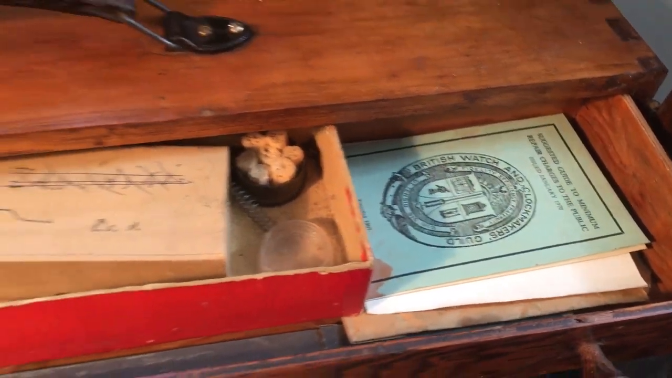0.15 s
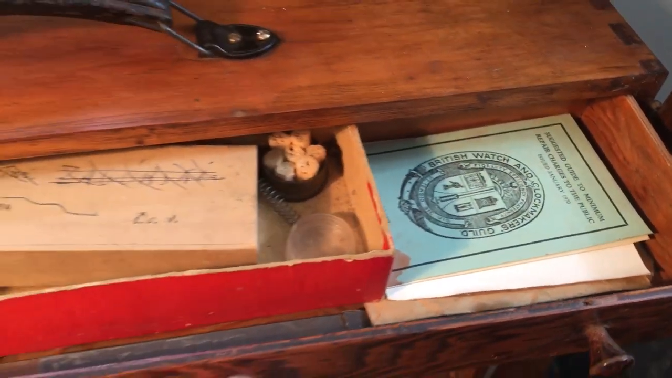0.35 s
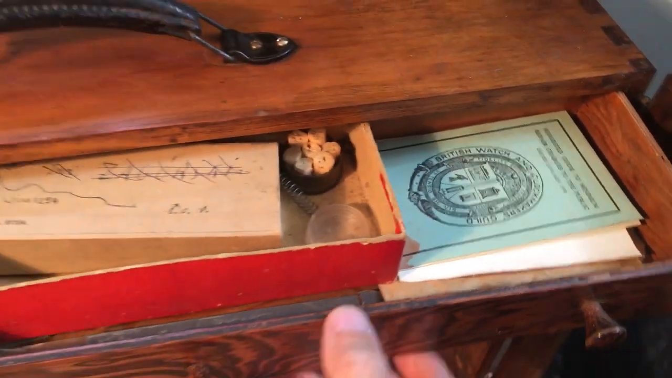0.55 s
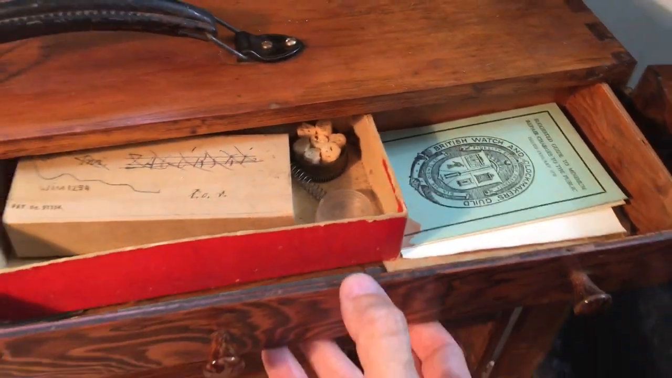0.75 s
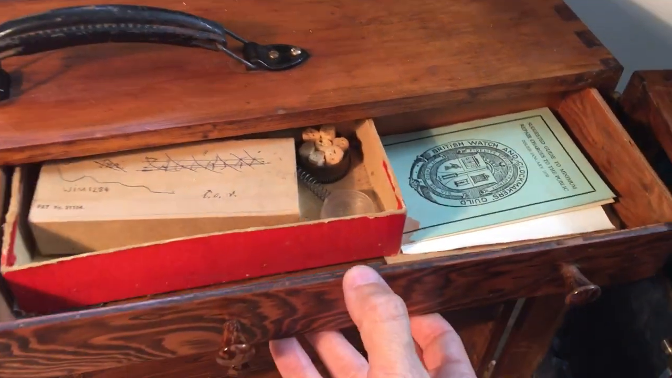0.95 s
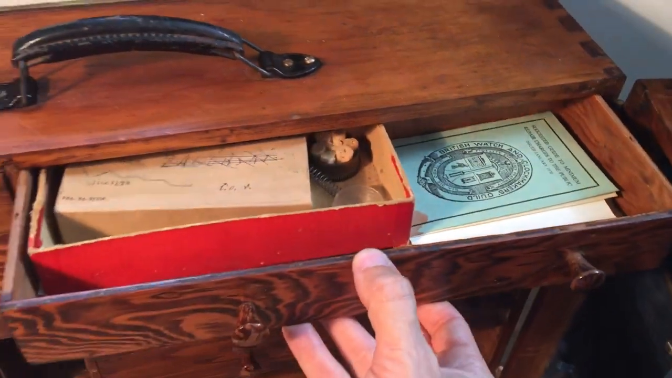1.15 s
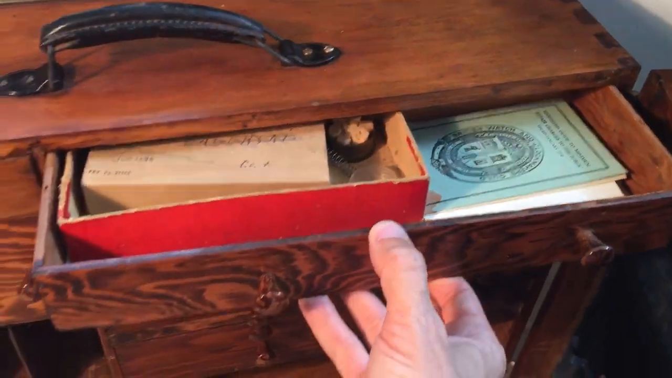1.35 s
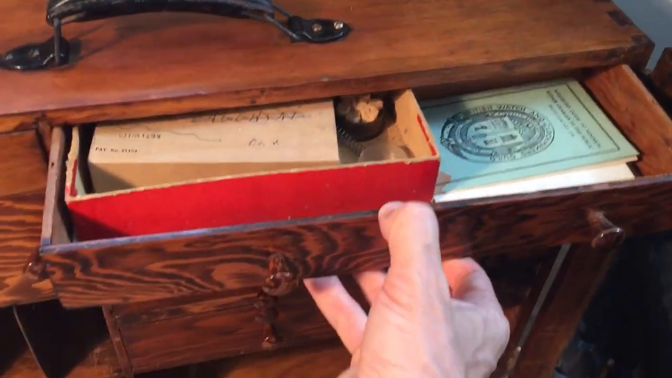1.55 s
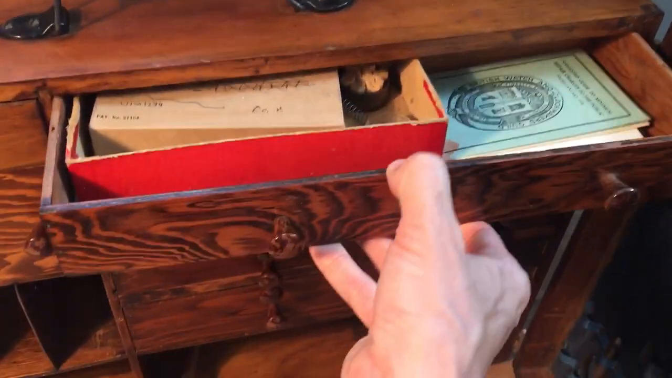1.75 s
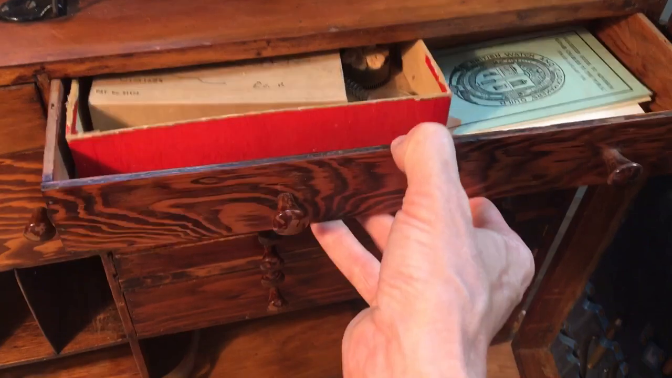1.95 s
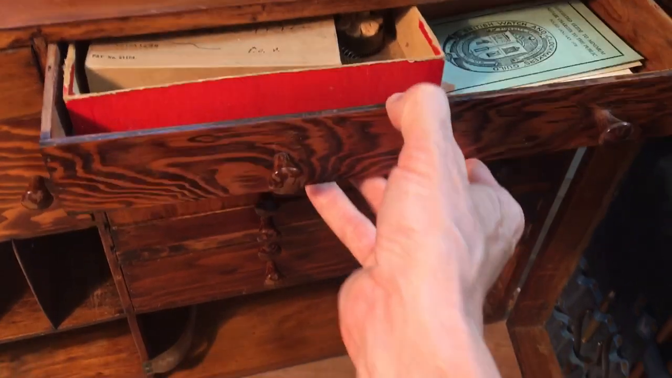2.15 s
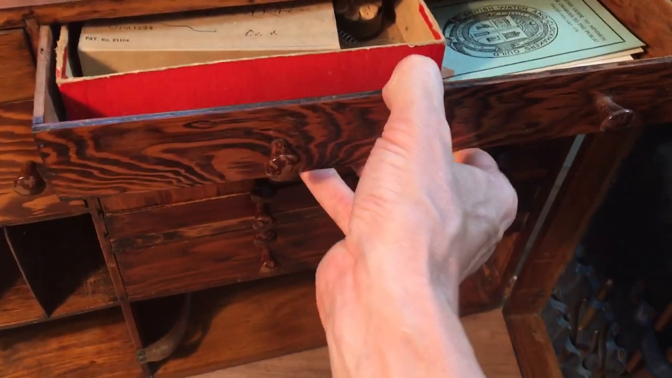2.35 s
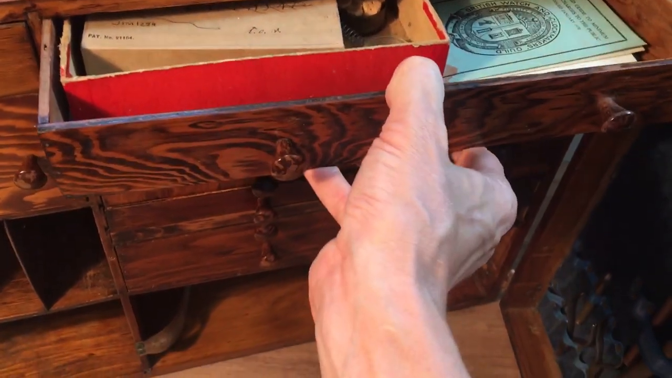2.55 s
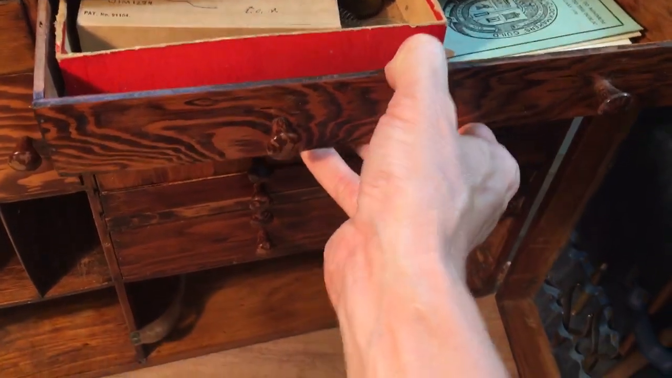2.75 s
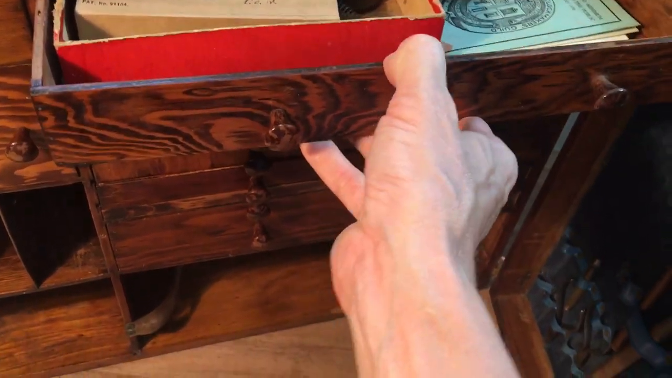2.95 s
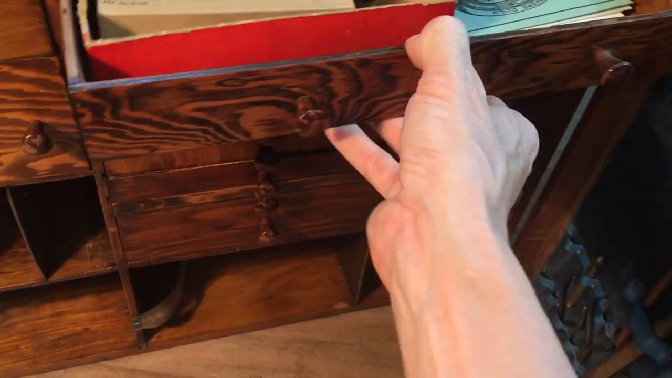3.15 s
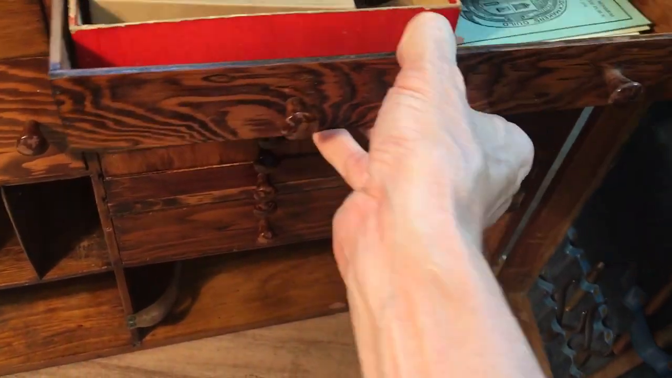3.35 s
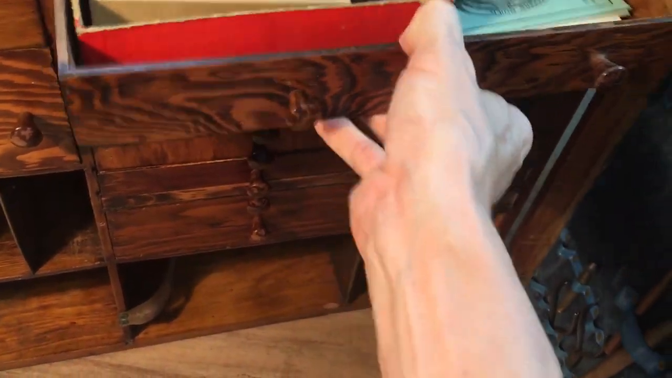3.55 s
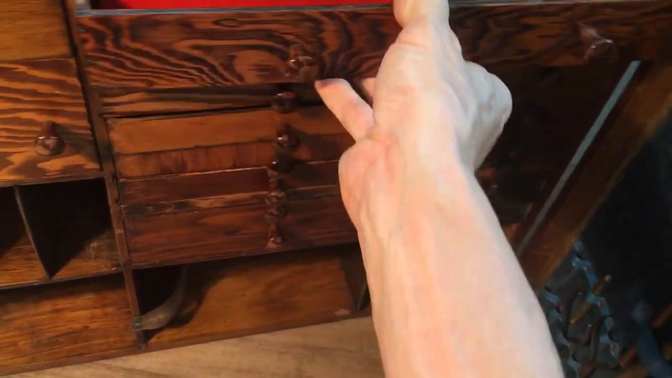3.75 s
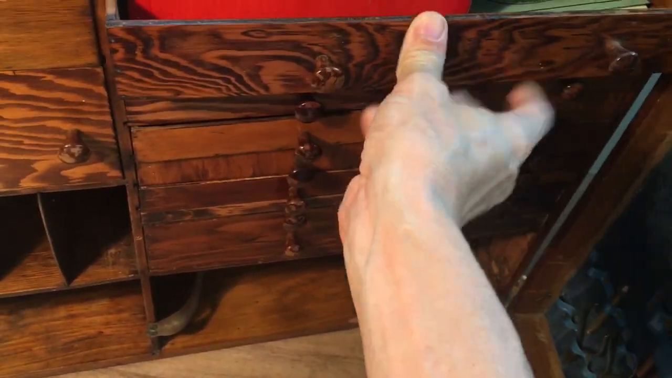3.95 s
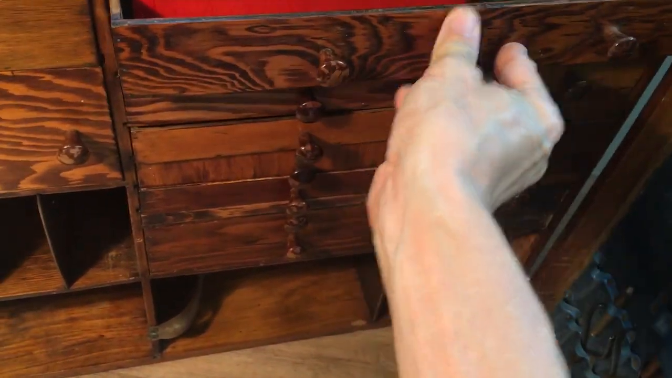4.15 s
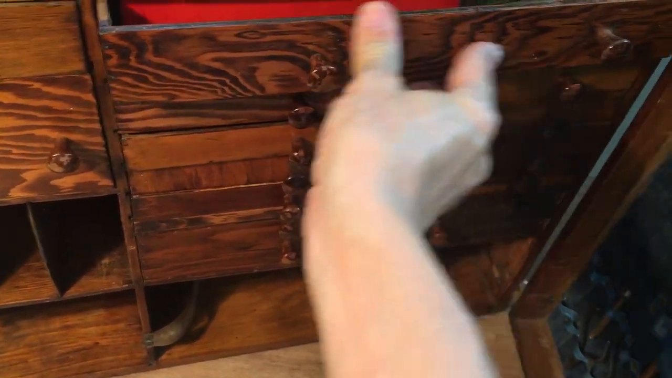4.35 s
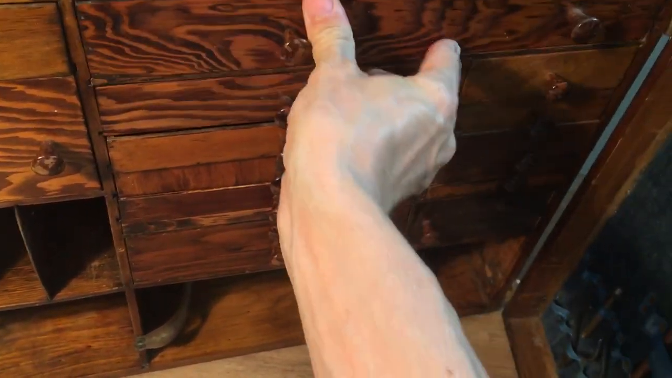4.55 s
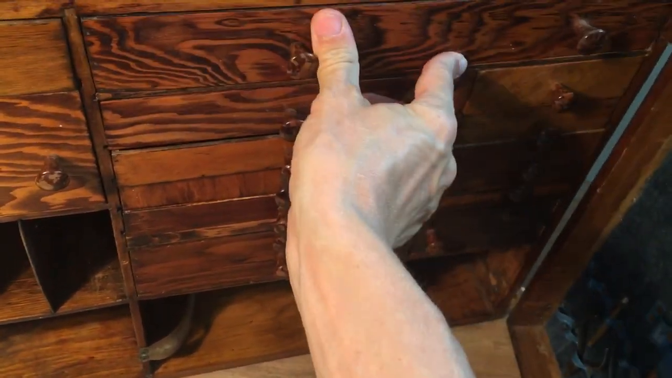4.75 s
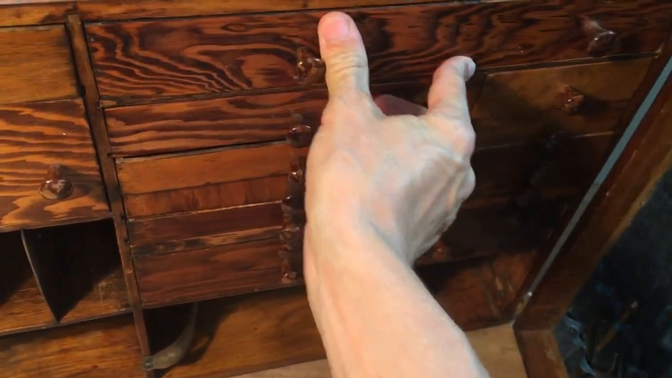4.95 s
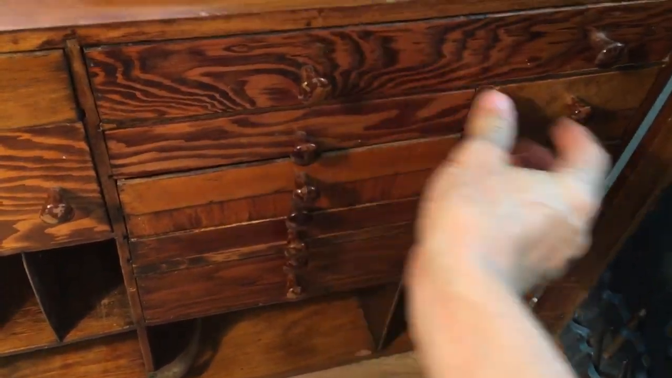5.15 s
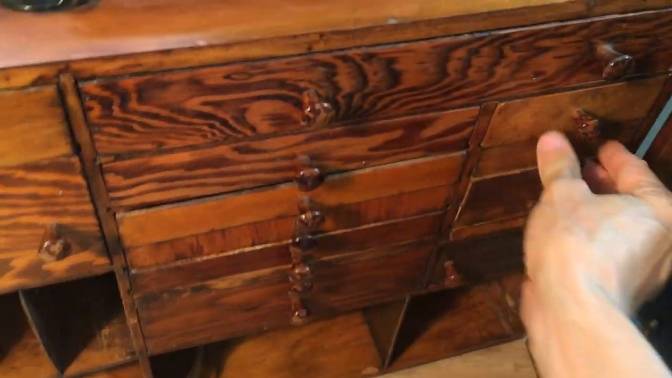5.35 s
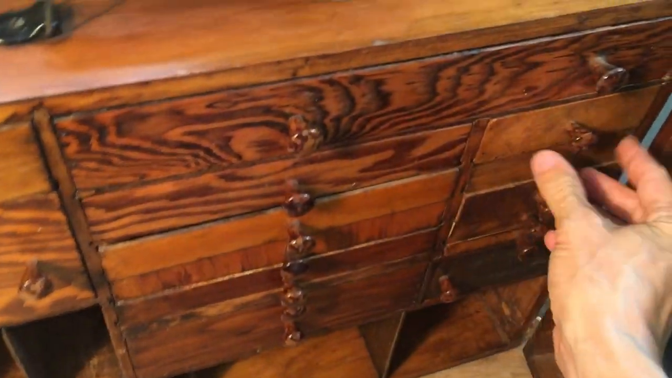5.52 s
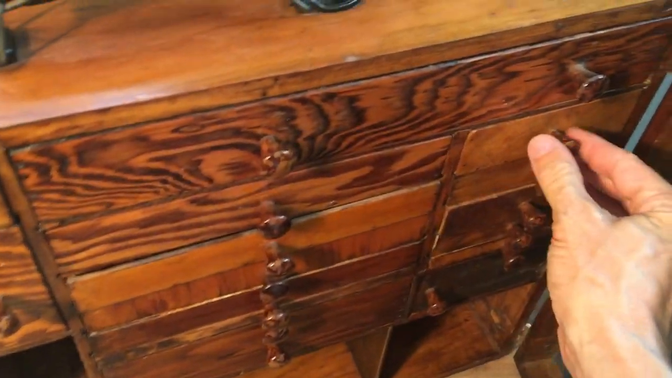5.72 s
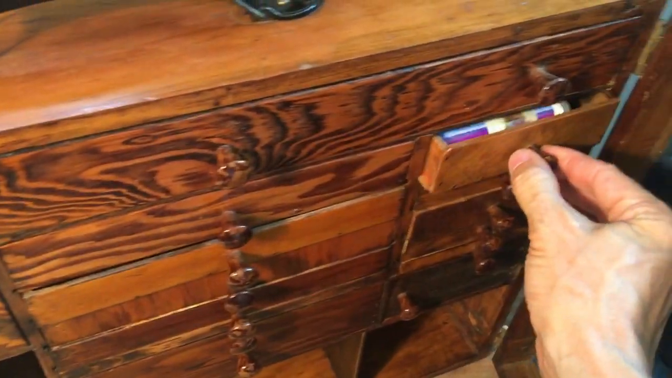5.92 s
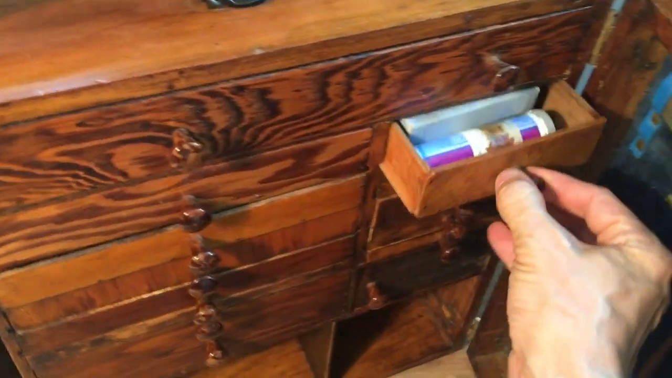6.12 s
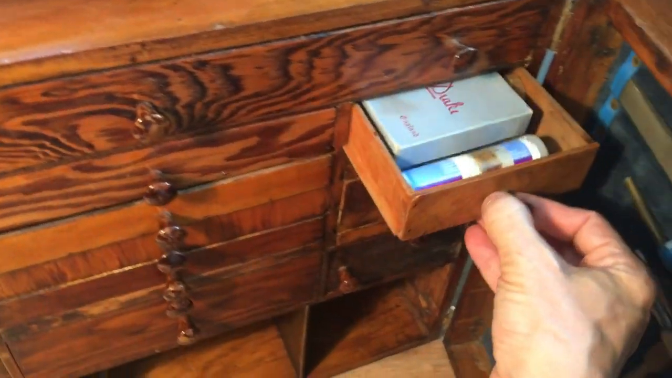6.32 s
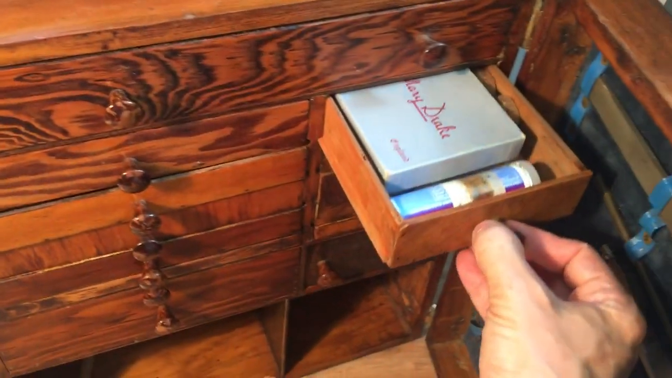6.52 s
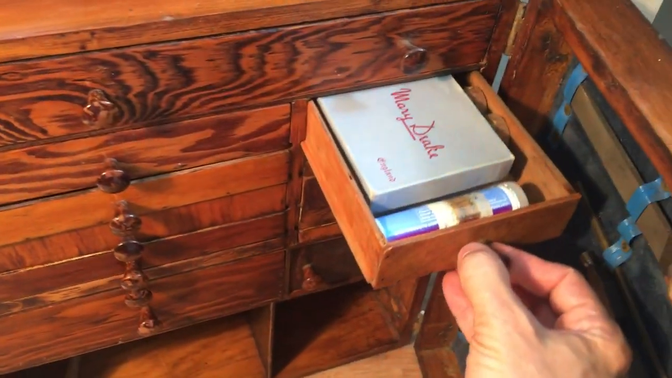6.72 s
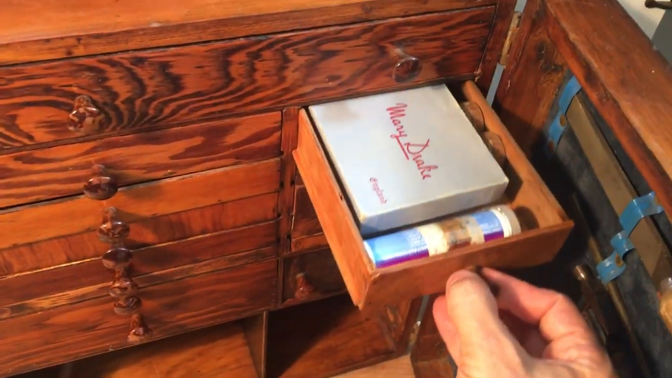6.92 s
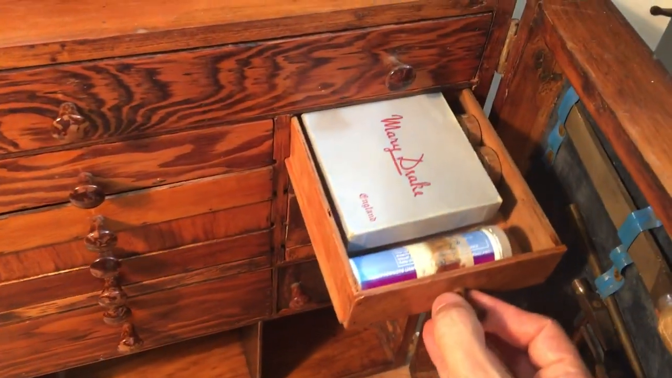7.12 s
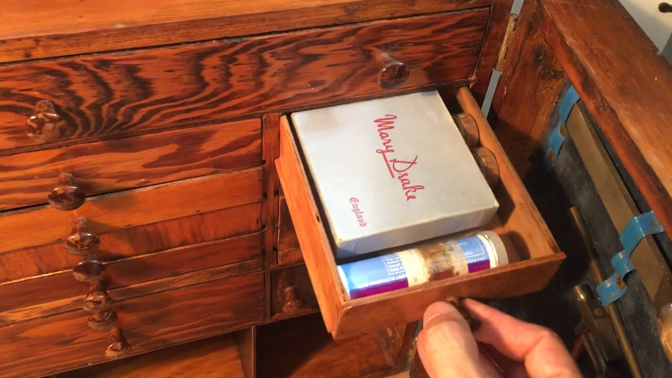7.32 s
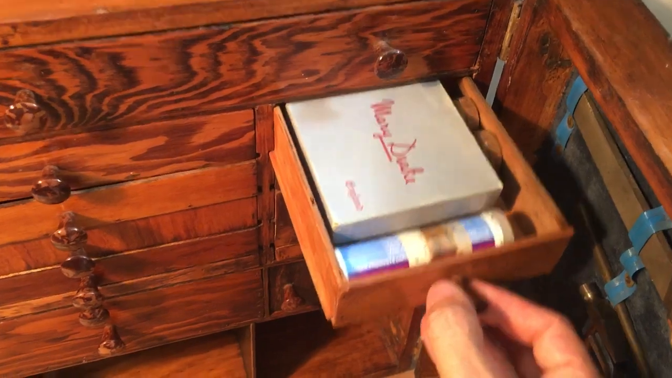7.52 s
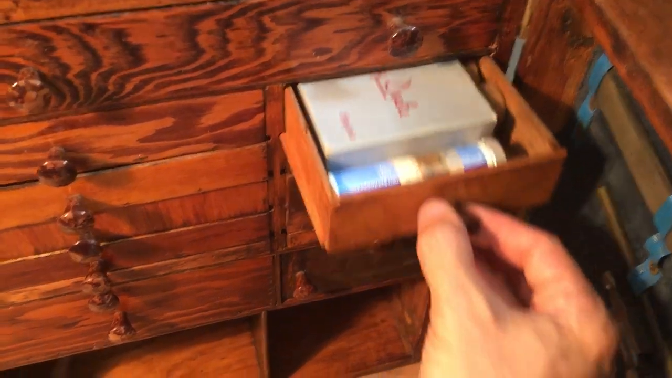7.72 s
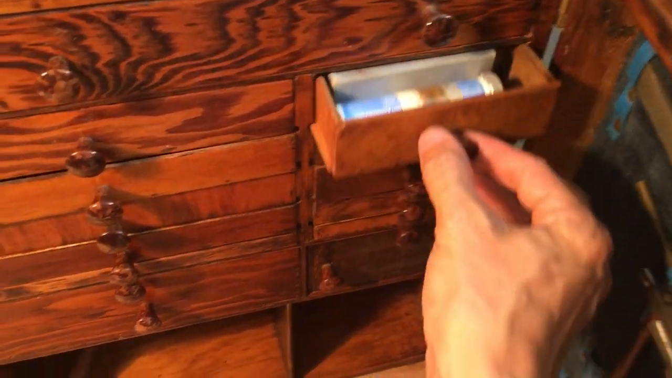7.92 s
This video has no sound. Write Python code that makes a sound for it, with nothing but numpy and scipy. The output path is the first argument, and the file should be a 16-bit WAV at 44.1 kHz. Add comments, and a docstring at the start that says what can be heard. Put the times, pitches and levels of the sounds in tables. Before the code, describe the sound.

Close wooden clunks and jerky scraping build as a wide drawer closes, followed by the quiet, hollow glide of a small drawer.

```python
"""A hand works the drawers of an old wooden chest in a quiet room, heard from close by.
A wide, loaded drawer is eased out and shoved home: jerky friction shakes the modes of the chest,
struck modes make its knocks and the ticks of its contents, and the heavier blows boom.
Then a small drawer glides out and back: fine friction noise hisses and sounds its hollow resonances.
Swelling noise bands, dull bumps, brushing skin, a short room tail and the house's uneven rumble complete it."""
import sys
import numpy as np
from scipy import signal
from scipy.fft import rfft
from scipy.io import wavfile
from scipy.ndimage import map_coordinates

SR = 44100
rng = np.random.default_rng(int(sys.argv[2]) if len(sys.argv) > 2 else 0)


def unload_audio(sound):
    """Save the sound as a 16-bit wav file, at the path given as the first command line argument."""
    columns = np.transpose(np.atleast_2d(sound))
    # keep every value between -1 and 1, then stretch to whole-number steps
    steps = np.round(np.clip(columns, -1, 1) * 32767)
    wavfile.write(sys.argv[1], SR, steps.astype(np.int16))


N = 351899
TAPS = 8192  # length of a blow and of a filter's design, samples
BLOW = 882  # the first 20 ms of a blow, samples
HZ = np.fft.rfftfreq(TAPS, 1 / SR)
TIME = np.arange(N) / SR

# wood knocking on wood: start_s, favoured_hz (modes the contact point favours), strength_db,
# weight_db (extra bass from the weight behind it), hardness_db (extra treble)
KNOCK_EVENTS = [(0.273, 756, -47, -6.5, -1), (0.308, 1580, -55, 9.5, 13), (1.011, 233, -63.5, 10.5, -2),
                (1.084, 241, -50, 9.5, -15), (1.106, 250, -64, 17, 7), (1.231, 700, -40.5, -21, -1),
                (1.307, 734, -47.5, 3, -6), (1.672, 1500, -68, 5, 14), (1.724, 171, -52.5, 12, 7),
                (1.737, 233, -43.5, 8.5, -11), (1.91, 1220, -23.5, -2.5, 0.5), (1.968, 306, -44, 11.5, -22),
                (1.978, 650, -34, -6, -9), (2.039, 187, -53.5, 16.5, 3), (2.187, 283, -42, 8, -1),
                (2.367, 1150, -66, 4, 10), (2.413, 220, -61.5, 9.5, 16), (2.532, 340, -37.5, 3.5, 0.5),
                (2.619, 257, -58, 14, 7), (2.757, 243, -67, 16.5, 10), (2.851, 265, -31.5, 9.5, 0),
                (2.884, 740, -45, -10, 9.5), (3.009, 245, -33, -1, -0.5), (3.106, 374, -29, -0.5, 4.5),
                (3.13, 350, -30, 6.5, -2), (3.388, 880, -18.5, -4, -4.5), (3.408, 690, -40, 3, 9),
                (3.512, 240, -28.5, 1.5, -5.5), (3.558, 610, -21, -7, -8.5), (3.579, 676, -30, 0.5, -9),
                (3.607, 315, -27.5, 3, 1), (3.638, 980, -29.5, 3.5, -3), (3.649, 970, -23, -6, 7),
                (3.655, 1020, -25, -1, -3.5), (3.72, 860, -19, -2.5, -3), (3.741, 850, -34.5, 4.5, -6.5),
                (3.796, 335, -29.5, 8.5, 3.5), (4.081, 440, -26.5, -0.5, 2.5), (4.18, 348, -31.5, 7.5, 1.5),
                (4.202, 378, -23.5, 2.5, 4), (4.514, 1220, -49.5, 9.5, 24.5),
                (4.588, 1040, -24.5, 3.5, 6.5), (4.619, 1350, -27, 1, 6), (4.812, 940, -58, -10, 1),
                (4.861, 1260, -53, -14, 3.5), (4.923, 950, -57.5, -9, 3), (5.205, 1280, -59.5, -6, 10.5),
                (5.247, 437, -64.5, 0, 5), (5.321, 300, -60, 1, 4), (5.348, 430, -46, 0, 4),
                (5.353, 424, -49, -0.5, 0), (5.366, 425, -50, 2.5, -5), (5.506, 405, -44.5, 0.5, 2),
                (5.675, 430, -62, 1, 7), (5.783, 230, -61, 6.5, -5), (5.901, 320, -55.5, 8.5, -2),
                (5.927, 420, -45, 0.5, -2.5), (6.042, 340, -51.5, 7, 0), (6.253, 322, -58.5, 10.5, 2),
                (6.402, 445, -49, -3.5, 8), (6.748, 238, -69, 8, 2), (7.012, 198, -62.5, 6.5, -2)]
# modes of the chest with its wide drawer: pitch_hz, level_db (relative), t60_s
CHEST_MODES = [(167, -0.5, 0.046), (212.5, 1.5, 0.074), (265, 1.5, 0.056), (301.8, -0.5, 0.074),
               (342.4, 0, 0.05), (425.7, -1, 0.072), (600.6, -2.5, 0.048), (672.6, -5, 0.076),
               (756.5, -6.5, 0.11), (863.4, 2.5, 0.046), (1048.6, -4, 0.077), (1193, -3, 0.058),
               (1292, -4, .05), (1460, -4, 0.069), (1618, -7, 0.068), (1804, -6, 0.045),
               (1920, -8.5, 0.031), (2136, -9.5, 0.046), (2380, -12.5, 0.026), (2650, -15, 0.038),
               (2870, -30, 0.08), (3220, -17.5, 0.054), (3660, -20.5, 0.07)]


def wide_drawer(mode_width_hz=35, split_hz=480):
    """Rough sliding shakes the modes of the chest, the upper ones when it bites; the surfaces themselves hiss."""
    # hiss of the sliding surfaces: pitch_hz, level_db (relative)
    slide_hiss = [(300, -24.5), (1200, 5), (2800, 5), (4500, 1.5), (6600, -1.5), (9000, -5), (12000, -9.5),
                  (15500, -11.5)]
    rings = [(hz, mode_width_hz, db) for hz, db, _ in CHEST_MODES]
    rings.append((100, 51, -9))  # bass resonance: Hz, width Hz, dB
    shake = colour(friction(grain_db=3.5, judder_db=5, judder_hz=140.7), resonances(rings))
    shake = unit(low_cut(shake, hz=79.6, order=3))
    shake = wander(shake, depth=0.027, rate_hz=6)
    # split into a lower and an upper layer, so that biting can raise the upper one alone
    rasp = colour(shake, -10 * np.log10(1 + (split_hz / (HZ + 1)) ** 6))
    rumble = colour(shake, -10 * np.log10(1 + (HZ / split_hz) ** 6))
    hiss = colour(friction(grain_db=4.5, judder_db=3.5, judder_hz=253.5), read(slide_hiss, HZ))
    hiss = hiss / band_rms(hiss, 3000, 15000)
    rumble_gain, rasp_gain, hiss_gain = rubbing_force()
    return rumble * rumble_gain + rasp * rasp_gain + hiss * hiss_gain


def rubbing_force():
    """Gains of rumble, rasp and hiss: each jerk of the wide drawer rubs, and each knock leaves it chattering."""
    # short jerks: start_s, length_s, grind_db, bite_db (upper modes against the grinding), hiss_db
    scrapes = [(0.525, 0.064, -61.5, -12, -69.5), (0.614, 0.057, -58, -7, -63.5),
               (1.1, 0.1, -62, -7, -69.5), (1.161, 0.14, -49, -1.5, -57), (1.374, 0.086, -51, -12, -77),
               (1.444, 0.052, -46.5, -23, -63.5), (1.508, .04, -52.5, -20, -72),
               (1.571, 0.042, -46.5, -14, -70), (1.69, 0.056, -51.5, -1, -65),
               (1.797, 0.15, -54.5, -9, -89), (1.934, .12, -51, -1, -60), (1.97, 0.031, -34.5, -2, -58),
               (2.082, 0.038, -48.5, 0, -65.5), (2.122, 0.2, -53, -4.5, -67),
               (2.594, 0.18, -54, -17, -74.5), (2.831, 0.041, -47.5, -3, -59), (2.88, 0.057, -59, 4.5, -67),
               (3.002, 0.09, -42.5, -16, -57.5), (3.091, 0.046, -31, -2, -46.5), (3.16, 0.19, -52, -1, -66),
               (3.335, .065, -31.5, -2, -48), (3.42, 0.29, -40.5, -4.5, -68), (3.539, .11, -40, 2, -51),
               (3.647, 0.16, -33.5, -1.5, -55), (3.824, .11, -51, 2, -64.5), (3.944, 0.087, -57, 3, -98),
               (4.029, 0.017, -52.5, 8.5, -63), (4.155, 0.043, -38, 5, -47.5), (4.24, 0.092, -57, 0, -68),
               (4.355, 0.11, -65, 6, -59), (4.494, .095, -40, 4.5, -47.5), (4.682, 0.05, -64, 4, -58.5),
               (4.784, 0.058, -56, 0, -80), (5.032, 0.059, -54, -2, -69), (5.39, 0.11, -64.5, 1, -75),
               (5.598, 0.095, -70, 5, -69), (5.694, 0.12, -64, 1.5, -70.5)]
    grip_share, release_s = 0.389, 0.027  # share of a jerk spent building up; decay constant after it
    chatter_s = 0.013  # time from the knock to the peak of its chatter
    rumble_db, rasp_db = -9.5, -15  # chatter: rumble against the thump, rasp against the body
    power, t = np.zeros((3, N)), np.arange(SR // 2) / SR
    for start, length, grind_db, bite_db, hiss_db in scrapes:
        build_up = np.minimum(t / (grip_share * length), 1)
        jerk = build_up * np.exp(-np.maximum(t - length, 0) / release_s)
        for layer, layer_db in zip(power, (grind_db, grind_db + bite_db, hiss_db)):
            add(layer, start, (amp(layer_db) * jerk) ** 2)
    chatter = t / chatter_s * np.exp(1 - t / chatter_s)
    for start, _, *force in KNOCK_EVENTS:
        thump_db, body_db, _, _ = knock_levels(*force)
        # chatter feeds rumble and rasp but not the hiss
        for layer, layer_db in zip(power, (thump_db + rumble_db, body_db + rasp_db)):
            add(layer, start, (amp(layer_db) * chatter) ** 2)
    return np.sqrt(power)


def knocks(favour_db=10, favour_octaves=0.19, crunch=0.063, rise_s=0.00032, detune=0.013, scatter_db=2):
    """The drawers hit their runners and stops; light taps ring purer than hard blows."""
    # edges of thump, body, clack and edge: band_edge_hz
    knock_bands = [130, 450, 1300, 3000, 15000]
    # the many short-lived modes between the chest's main ones: pitch_hz, level_db (relative)
    dense_wood = [(60, -12.5), (130, -3.5), (230, -6), (500, -9), (1000, -3), (1600, -9.5), (2500, -19),
                  (4000, -27), (7000, -40.5), (15000, -47)]
    out = np.zeros(N)
    hardest_db = np.array(KNOCK_EVENTS)[:, 2].max()
    for start, favoured_hz, *force in KNOCK_EVENTS:
        levels_db = knock_levels(*force)
        # the modes shift a little with how far the drawer is out and how it is held
        shift, scatter = rng.standard_normal((2, len(CHEST_MODES)))
        modes = np.array(CHEST_MODES, float)
        favoured = np.exp(-(np.log2(modes[:, 0] / favoured_hz) / favour_octaves) ** 2)
        modes[:, 0] *= 1 + detune * shift * (1 - favoured)
        weights_db = favour_db * favoured + scatter_db * scatter * (1 - favoured)
        dense_db = crunch * (max(levels_db) - hardest_db) - 3
        # a dull thud is a slower contact than a sharp clack
        softness = np.clip(amp(levels_db[0] - levels_db[1]), 1, 5)
        blow = struck(modes, weights_db, dense_wood, dense_db, dense_t60=.036, rise_s=rise_s * softness)
        blow = low_cut(blow, hz=120, order=4)
        add(out, start, contact(blow, knock_bands, levels_db))
    return out


def knock_levels(db, weight_db, hardness_db):
    """Thump, body, clack and edge of a knock in dB: weight feeds the bass, hardness the treble."""
    # wood gives under a strong blow: above -44 dB, each dB of strength costs 0.2 dB of edge
    crushed_db = 0.2 * max(db + 44, 0)
    clack_db = db + hardness_db - 10
    edge_db = db + hardness_db - 21.5 - crushed_db
    return [db + weight_db, db, clack_db, edge_db]


def ticks(scatter_db=3, detune=0.021):
    """Light, hard contacts with hardly any bass; no two things in the drawer ring quite alike."""
    # small hard things and fingernails ticking: start_s, strength_db, brightness_db
    tick_events = [(0.309, -62, -1.5), (1.012, -61, -6), (1.087, -73, 2), (1.46, -65.5, 2.5),
                   (1.577, -68, 2), (1.622, -61, 4.5), (1.767, -63.5, 3), (1.793, -63, -1), (1.858, -52, 2),
                   (1.949, -68, 11.5), (1.993, -48.5, -4), (2.273, -58, 3.5), (2.412, -67, -3),
                   (2.507, -54, -4.5), (2.524, -58.5, -2.5), (2.54, -61.5, -1), (2.618, -51, -1.5),
                   (2.99, -53, -1.5), (3.127, -44, -2.5), (3.19, -54, -3), (3.6, -46.5, -4.5),
                   (3.631, -32, -5), (3.793, -46, -1), (3.852, -64, 2), (4.034, -63, -7),
                   (4.188, -43.5, -7.5), (4.324, -70.5, -0.5), (4.691, -48, 1), (5.061, -68, 1),
                   (5.171, -74, 2), (5.471, -65.5, -1.5)]
    # edges of a tick's clack, middle and fizz: band_edge_hz
    tick_bands = [1300, 3000, 5500, 15000]
    # modes of the things in the drawer: pitch_hz, level_db (relative), t60_s
    contents = [(1800, -7.5, 0.032), (2460, -4.5, 0.045), (2893, -4.5, 0.023), (3730, -9, 0.017),
                (3710, 11, 0.022), (6040, -10, 0.017), (6460, 13, 0.035), (7200, -22.5, 0.024),
                (8970, 6.5, 0.02)]
    # the short-lived modes between those: pitch_hz, level_db (relative)
    crisp = [(200, -12.5), (800, -7), (1800, -6.5), (4000, 8), (7000, 3), (10000, -9), (15000, -17)]
    out = np.zeros(N)
    for start, db, bright_db in tick_events:
        shift, scatter = rng.standard_normal((2, len(contents)))
        modes = np.array(contents, float)
        modes[:, 0] *= 1 + detune * shift
        blow = struck(modes, scatter_db * scatter, crisp, dense_db=2, dense_t60=.032, rise_s=.0001)
        # brightness tilts the outer bands against each other
        levels_db = [db - bright_db, db - 4, db + bright_db]
        add(out, start, contact(blow, tick_bands, levels_db))
    return out


def struck(modes, weights_db, dense, dense_db, dense_t60, rise_s):
    """One blow: named modes, each as strong as the contact point allows, over a burst of short-lived ones."""
    t = np.arange(TAPS) / SR
    hz, db, t60 = np.transpose(modes)
    size = amp(db + weights_db) * rng.choice([-1, 1], len(hz))
    ring = size @ (np.sin(2 * np.pi * hz[:, None] * t) * amp(-60 * t / t60[:, None]))
    burst = colour(rng.standard_normal(TAPS) * amp(-60 * t / dense_t60), read(dense, HZ))
    # the shock takes a moment to spread through the boards
    return (unit(ring) + amp(dense_db) * unit(burst)) * (1 - np.exp(-t / rise_s))


def contact(sound, edges, levels_db):
    """The force and hardness of a contact set the level of each band over the first 20 ms."""
    bands = list(zip(edges[:-1], edges[1:]))
    centres = [np.sqrt(lo * hi) for lo, hi in bands]
    fade = signal.windows.tukey(2 * BLOW, .2)[BLOW:]
    for _ in range(2):  # neighbouring bands overlap, so a second pass comes closer
        start = sound[:BLOW] * fade
        lift_db = [db - 20 * np.log10(band_rms(start, *band)) for db, band in zip(levels_db, bands)]
        sound = colour(sound, read(list(zip(centres, lift_db)), HZ))
    return sound


def boom(blows, gain_db=12, hz=95, width_hz=6):
    """Blows rock the whole chest, which hums on at one low note over a dull shudder of the floor."""
    floor = (52, 35, -1)  # Hz, width Hz, dB
    broad_db = resonances([(hz, 6 * width_hz, 0), floor])
    narrow_db = resonances([(hz, width_hz, 0), floor])
    # while the wide drawer is shoved home, blows rock the chest 3 dB more
    shoved = (TIME > 2.7) & (TIME < 4.0)
    return colour(blows * amp(gain_db + 3 * shoved), 2 * broad_db + narrow_db)


def bumps(rise_s=0.0073):
    """Soft pushes that swing the chest for only a few cycles."""
    # a drawer settling in its opening: start_s, pitch_hz, level_db (peak of the envelope)
    bump_events = [(0.864, 132, -52.5), (1.299, 84, -42), (1.731, 80, -41), (4.665, 90, -33.5),
                   (4.7, 94, -41), (4.735, 97, -37.5), (4.921, 140.4, -45), (5.98, 62.4, -46),
                   (6.068, 107, -46.5), (6.089, 119, -51), (6.265, 114, -49), (6.747, 85, -47.5),
                   (7.012, 101.5, -48.5), (7.657, 169.7, -51.5)]
    out, t = np.zeros(N), np.arange(TAPS) / SR
    push = t / rise_s * np.exp(1 - t / rise_s)
    for start, hz, db in bump_events:
        add(out, start, amp(db) * push * np.sin(2 * np.pi * hz * t))
    return out


def small_drawer(stroke, rings):
    """Fine, even friction, heard directly and through the hollow of the drawer; returns both layers."""
    # friction of smooth wood: pitch_hz, level_db (relative)
    glide = [(59, -37), (100, 3.5), (159, -8), (201, 0), (326, -5), (386, -2), (541, -10), (627, -1),
             (682, -8), (861, -1), (2420, -6), (2810, -6.5), (4960, -14), (6810, -12.5), (15500, -20.5)]
    hiss = colour(friction(grain_db=4.5, judder_db=1.04, judder_hz=140), read(glide, HZ))
    hollow = colour(friction(grain_db=1.5, judder_db=2.5, judder_hz=55.28), resonances(rings))
    hollow = wander(hollow, depth=.007, rate_hz=12)
    hiss = hiss / band_rms(hiss, 7000, 15000) * level(stroke, axis=1)
    hollow = hollow / band_rms(hollow, 450, 3000) * level(stroke, axis=2)
    return hiss, hollow


def small_drawer_pull():
    """The small drawer, hanging from its knob, is drawn out and nudged further."""
    # drawing out: time_s, hiss_db, hollow_db (before the lift and freedom below)
    draw = [(5.86, -80, -79), (5.898, -70, -53), (6.014, -60, -61), (6.222, -56.5, -47.5),
            (6.36, -57, -59.5), (6.464, -56, -46), (6.744, -69, -54), (6.832, -90, -69.5), (6.86, -83, -73)]
    # nudging further: the same columns, time_s, hiss_db, hollow_db
    nudge = [(6.87, -83, -68), (6.922, -91, -75), (6.964, -75, -59), (7.0, -74, -59), (7.04, -88, -76.5),
             (7.1, -84, -86)]
    # resonances while it hangs from its knob: pitch_hz, width_hz, level_db (relative)
    hanging_rings = [(241.7, 29, -5), (518, 32.4, 1.5), (643, 41, -5), (905, 70, -4), (1058, 180, -7),
                     (1900, 97, -11.5), (2270, 110, -4.5), (2772, 78, 0.5), (4150, 197, -15),
                     (4580, 120, -12.5), (5375, 300, -19.5), (5900, 140, -14.5), (6760, 130, -13.5)]
    hiss, hollow = small_drawer(list(draw) + list(nudge), hanging_rings)
    return hiss + amp(3) * freedom() * hollow


def freedom():
    """The small drawer rings more freely once it clears the chest: -8 dB until 6.2 s, 0 dB from 6.45 s."""
    return amp(np.interp(TIME, [6.2, 6.45], [-8, 0]))


def small_drawer_push():
    """The small drawer, pressed back on its runners, is pushed in."""
    # pushing in: time_s, hiss_db (before the trim below), hollow_db
    stroke = [(7.48, -94.5, -81), (7.578, -59.5, -55), (7.626, -59, -54.5), (7.806, -52.5, -39.5),
              (7.856, -50, -53), (7.96, -54, -52), (7.98, -51, -54)]
    # resonances while pressed on its runners: pitch_hz, width_hz, level_db (relative)
    pressed_rings = [(243, 29, -3), (395, 58, -2.5), (906, 100, -6.5), (1060, 60, -9.5), (1393, 42, -6),
                     (2440, 62, -8), (2773, 220, -5.5), (3210, 200, -23), (4474, 160, -14),
                     (5730, 180, -19), (6800, 120, -22.5)]
    hiss, hollow = small_drawer(stroke, pressed_rings)
    return amp(-3.5) * hiss + hollow


def noise_bands():
    """Bands of filtered noise, narrow to broad, that swell and fade."""
    # hand rubs, a tick's bright tail and the small drawer's hollow ringing:
    # start_s, end_s, centre_hz, width_hz, level_db (before fades)
    band_events = [(0.525, 0.695, 5300, 900, -63.5), (0.524, 0.706, 3180, 160, -73),
                   (1.45, 1.658, 6500, 800, -72.5), (4.687, 4.744, 9100, 1700, -57.5),
                   (6.428, 6.546, 1064, 129, -43.5), (6.44, 6.532, 515, 30, -48),
                   (6.59, 6.786, 532.5, 21.5, -49), (6.95, 7.051, 503, 35.4, -56.5),
                   (7.322, 7.44, 894, 121.6, -72.5), (7.516, 7.63, 880, 35.5, -49),
                   (7.494, 7.63, 1617, 49.7, -61), (7.543, 7.614, 406, 69.6, -49.5),
                   (7.75, 7.84, 243, 30, -43), (7.76, 7.824, 1054, 90, -44)]
    out = np.zeros(N)
    for start, end, hz, width, db in band_events:
        count = max(round((end - start) * SR), BLOW)
        # the band filter's gain is doubled in dB, so its skirts are steep; its build-up is cut off
        band = colour(rng.standard_normal(TAPS + count), 2 * resonances([(hz, width, 0)]))[TAPS:]
        add(out, start, amp(db) * unit(band) * signal.windows.tukey(count, .75))
    return out


def brushes():
    """Smooth, bright friction of the fingers."""
    # skin brushing over varnish and paper: start_s, end_s, level_db (before fades)
    brush_events = [(0.273, 0.36, -65.5), (0.536, 0.735, -61.5), (1.17, 1.34, -69), (2.524, 2.561, -53.5),
                    (4.165, 4.22, -64), (4.368, 4.509, -55), (5.44, 5.53, -70)]
    # colour of the skin noise: pitch_hz, level_db (relative)
    skin = [(500, -24), (2000, -4), (5000, 3), (9000, 9.5), (13000, 4.5), (15500, 6.5)]
    out = np.zeros(N)
    for start, end, db in brush_events:
        count = max(round((end - start) * SR), BLOW)
        noise = unit(colour(rng.standard_normal(count), read(skin, HZ)))
        add(out, start, amp(db) * noise * signal.windows.tukey(count, .7))
    return out


def room(x, wet_db, build_s=0.0059):
    """A short tail of noise, each band dying at its own speed."""
    # decay of the room: pitch_hz, t60_s
    room_decay = [(90, 0.79), (220, 0.038), (560, 0.27), (1500, 0.24), (4000, 0.32), (12000, 0.2)]
    hz, t, z = signal.stft(rng.standard_normal(SR), SR, nperseg=256)
    decay = amp(-60 * t / read(room_decay, hz)[:, None])
    tail = signal.istft(z * decay, SR, nperseg=256)[1]
    tail = tail * (1 - np.exp(-(np.arange(len(tail)) / SR / build_s) ** 2))
    return amp(wet_db) * signal.fftconvolve(x, tail / np.linalg.norm(tail))[:N]


def air(swell_db=4.5, swell_hz=7):
    """Uneven low rumble of the house under a faint steady hiss: noise whose lows alone swell."""
    # colour of the quiet room: pitch_hz, level_db (relative)
    air_colour = [(20, -19.5), (55, 3), (90, -8.5), (120, -5), (190, -16), (320, -17), (550, -25),
                  (900, -23.5), (2400, -32), (7000, -35), (15500, -40.5)]
    noise = unit(colour(rng.standard_normal(N), read(air_colour, HZ)))
    rumble = signal.sosfiltfilt(signal.butter(2, 250, fs=SR, output="sos"), noise)
    swell = np.interp(TIME * swell_hz, np.arange(N), rng.standard_normal(N))
    return amp(-63.5) * (noise - rumble + rumble * amp(swell_db * swell))


def friction(grain_db, judder_db, judder_hz):
    """Countless tiny slips of uneven size, bunched by the grain of the wood."""
    knots = rng.standard_normal(N)
    judder = np.interp(TIME * judder_hz, np.arange(N), knots)
    slip_db = grain_db * rng.standard_normal(N) + judder_db * judder
    return unit(rng.standard_normal(N) * amp(slip_db))


def wander(x, depth, rate_hz):
    """Lets every resonance in x drift a little as the contact moves along the wood, by uneven playing speed."""
    drift = np.interp(TIME * rate_hz, np.arange(N), rng.standard_normal(N))
    return map_coordinates(x, [np.cumsum(1 + depth * drift)], order=3, mode="mirror")


def resonances(rings):
    """Gain in dB of a set of (Hz, width Hz, dB) resonances, their powers summed."""
    power = sum(amp(db) ** 2 / (1 + ((HZ ** 2 - hz ** 2) / (width * (HZ + 1))) ** 2) for hz, width, db in rings)
    return 10 * np.log10(power + 1e-12)


def low_cut(x, hz, order):
    """Small boards cannot radiate deep bass."""
    return signal.sosfilt(signal.butter(order, hz, "high", fs=SR, output="sos"), x)


def colour(x, db):
    """Causal minimum-phase filter with gain db at the frequencies HZ."""
    log_gain = np.log(amp(np.maximum(db, -100)))
    circle = np.concatenate([log_gain, log_gain[-2:0:-1]])
    # the Hilbert transform of the log gain gives the phase
    taps = np.fft.ifft(np.exp(np.conj(signal.hilbert(circle)))).real
    return signal.fftconvolve(x, taps[:TAPS // 2])[:len(x)]


def amp(db):
    """Decibels to gain."""
    return 10 ** (np.asarray(db) / 20)


def unit(x):
    """Scales to rms 1."""
    return x / np.sqrt(np.mean(x ** 2) + 1e-20)


def band_rms(x, lo_hz, hi_hz):
    """Rms of the part of x inside a band."""
    hz = np.fft.rfftfreq(len(x), 1 / SR)
    inside = (hz >= lo_hz) & (hz < hi_hz)
    return np.sqrt(2 * np.sum(abs(rfft(x)[inside]) ** 2) + 1e-20) / len(x)


def read(points, hz):
    """Reads a table on a log-frequency axis."""
    f, value = np.transpose(points)
    return np.interp(np.log(hz + 1), np.log(f + 1), value)


def level(rows, axis):
    """One dB column of a curve as a gain for every sample, -120 dB outside it."""
    rows = np.array(rows)
    return amp(np.interp(TIME, rows[:, 0], rows[:, axis], left=-120, right=-120))


def add(mix, s, sound):
    """Mixes a sound in at time s."""
    part = mix[round(s * SR):][:len(sound)]
    part += sound[:len(part)]


def scene():
    """Both drawers in the room; the heavy one rocks the chest even as it slides."""
    wide = wide_drawer()
    blows = knocks() + ticks()
    rocking = boom(blows + amp(-13) * wide)
    sliding = wide + small_drawer_pull() + small_drawer_push()
    details = noise_bands() + brushes()
    # only the blows and the rocking excite the room
    tail = room(blows + rocking, wet_db=-10.5)
    return (blows + rocking + tail + bumps() + sliding + details + air())[None]


def record(dry):
    """Limits the band with a steep linear-phase low-pass at 15850 Hz."""
    low_pass = signal.firwin(511, 15850, window=("kaiser", 9), fs=SR)
    return signal.oaconvolve(dry, low_pass[None], "same")


dry = scene()
out = record(dry)
unload_audio(out)
```